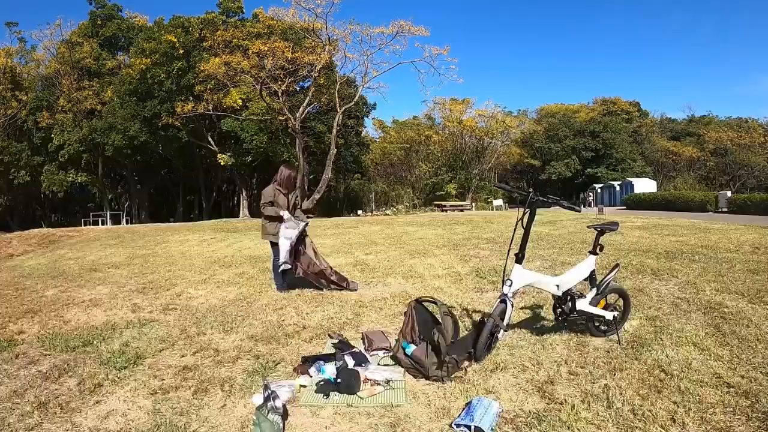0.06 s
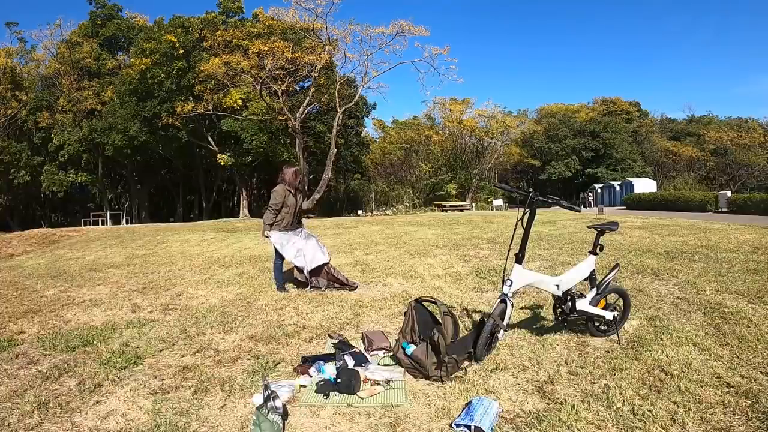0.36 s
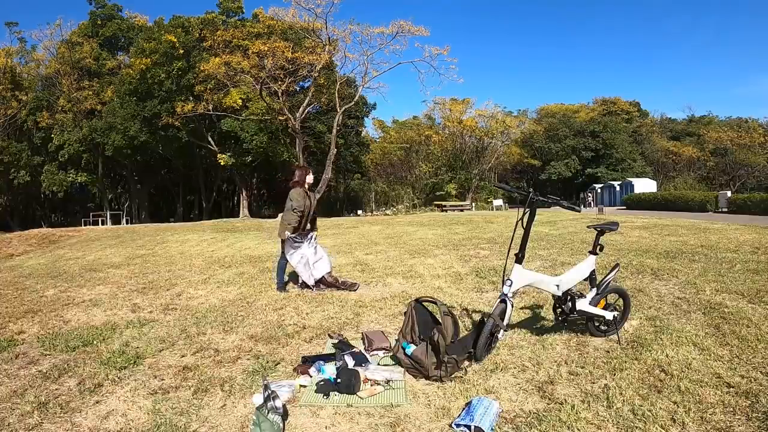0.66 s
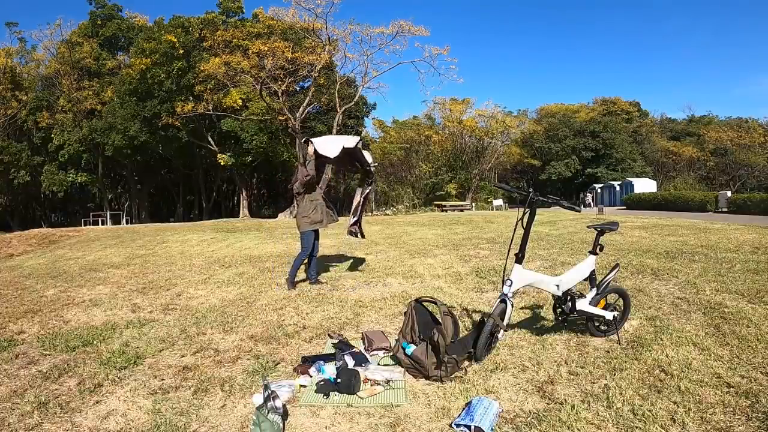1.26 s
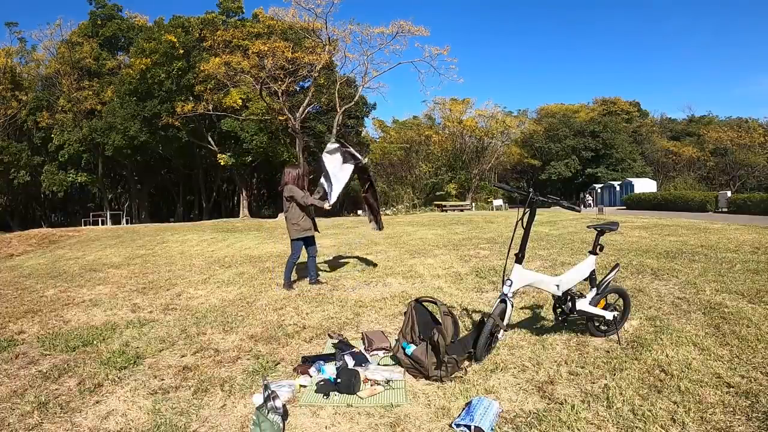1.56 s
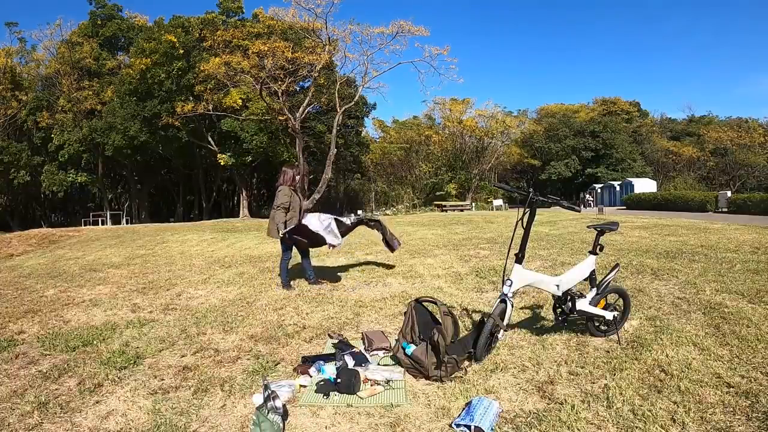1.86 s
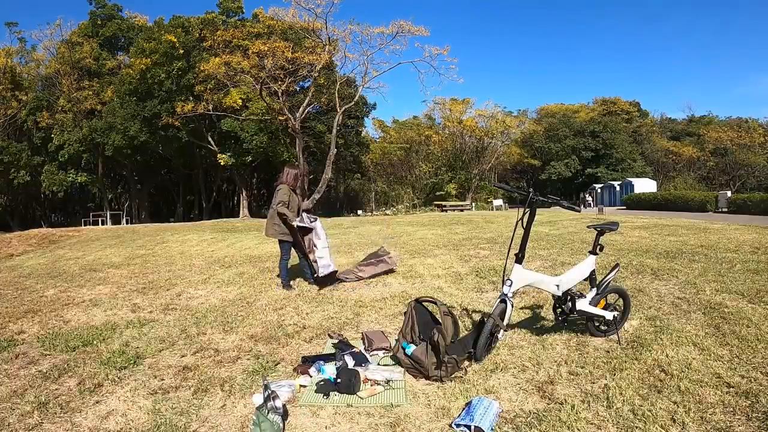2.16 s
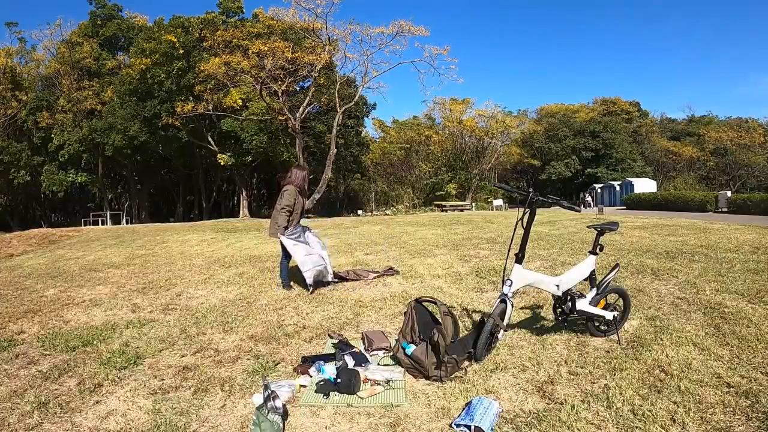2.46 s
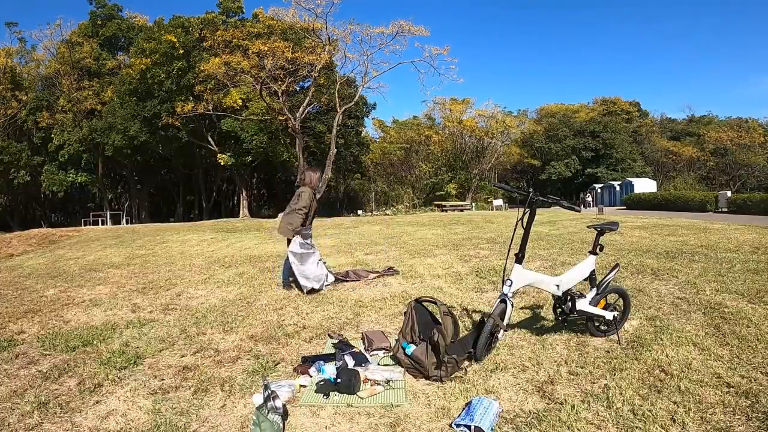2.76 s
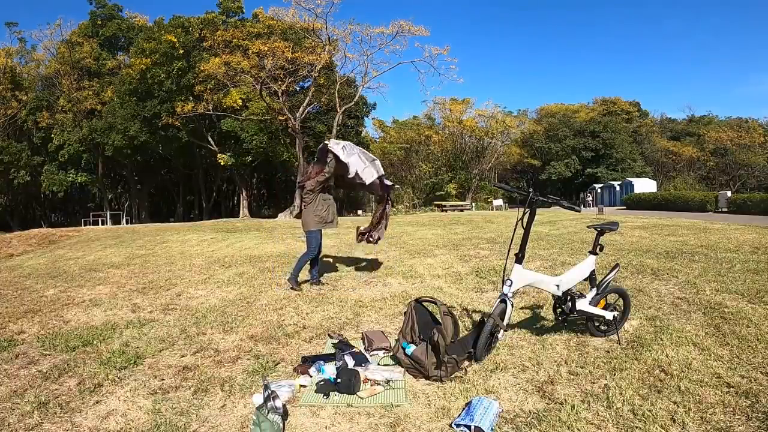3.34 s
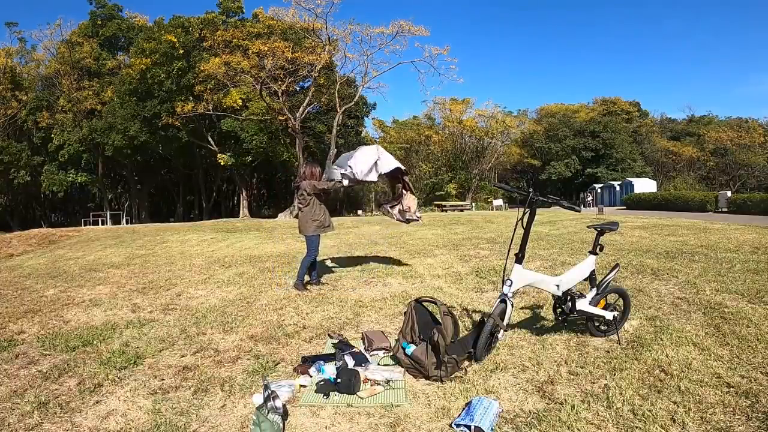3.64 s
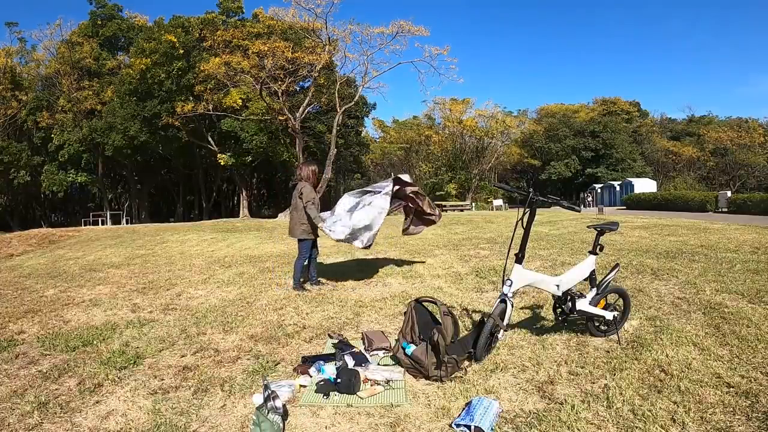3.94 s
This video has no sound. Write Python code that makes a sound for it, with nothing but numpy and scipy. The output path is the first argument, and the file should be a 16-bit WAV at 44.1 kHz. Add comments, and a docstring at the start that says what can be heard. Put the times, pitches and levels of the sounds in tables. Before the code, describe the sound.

A thin tarp rustles and crinkles as it is gathered, then swung up with a flapping whoosh. It settles on the grass with small snaps and is swung up again. A light breeze blows steadily across the open field.

```python
"""An open field cuts in from silence, nearly mono, with a light, steady breeze in the trees behind.
A thin tarp is gathered: the cloth billows, its folds crinkle in countless tiny buckles, its faces
slide with a hiss and creases snap. It is swung up at about 1 s, floats down, lands on the grass and
lies almost still, then is swung up again just after 3 s and starts to sink.
All along the grass reflects it with a hollow colour that follows its height."""
import sys
import numpy as np
from scipy import signal
from scipy.fft import rfft, irfft, next_fast_len
from scipy.io import wavfile
from scipy.ndimage import map_coordinates

SR = 44100
rng = np.random.default_rng(int(sys.argv[2]) if len(sys.argv) > 2 else 0)


def store_wav(level_fs):
    """Save 16-bit WAV to argv[1]."""
    pcm = np.round(np.clip(np.atleast_2d(level_fs), -1, 1) * 32767)
    wavfile.write(sys.argv[1], SR, pcm.T.astype(np.int16))


N = 176400


def amp(db):
    """Decibels to gain."""
    return 10 ** (np.asarray(db) / 20)


def unit(x):
    """Scale to rms 1."""
    return x / np.sqrt(np.mean(x ** 2) + 1e-20)


def wobble(rate):
    """A smooth random curve, rate knots a second."""
    return map_coordinates(rng.standard_normal(int(N * rate / SR) + 4), [np.arange(N) * rate / SR])


def coloured(x, points):
    """x through a minimum-phase EQ drawn as points of f/Hz, gain/dB."""
    m = 2 * next_fast_len(len(x))
    hz, db = np.transpose(points)
    log_gain = np.log(amp(np.interp(np.log(np.fft.rfftfreq(m, 1 / SR) + 1), np.log(hz), db)))
    causal_fold = np.r_[1, np.full(m // 2 - 1, 2), 1, np.zeros(m // 2 - 1)]
    cepstrum = irfft(log_gain, m) * causal_fold
    return irfft(rfft(x, m) * np.exp(rfft(cepstrum)), m)[:len(x)]


def noise(points):
    """Coloured noise of rms 1."""
    return unit(coloured(rng.standard_normal(N), points))


def breeze(gain_db=-46):
    """A steady bed of light wind in distant trees."""
    # wind spectrum: f/Hz, relative density/dB
    spectrum = [(20, -42), (30, -28), (38, -11), (52, -3.5), (72, -7.5), (130, -3.5), (180, -1),
                (250, -1.5), (330, -5), (580, -12), (750, -7.5), (1050, -4.5), (1500, -9.5), (2200, -10),
                (4500, -16.5), (6500, -27.5), (8500, -36.5), (9600, -33.5), (11000, -39), (14500, -54)]
    return amp(gain_db) * noise(spectrum)


def billow(level_db, gain_db=-2, flap_db=2, flaps_per_s=70):
    """The low body: air shoved about by the flapping sheet."""
    # spectrum of the shoved air: f/Hz, relative density/dB
    spectrum = [(25, -50), (70, -17.5), (135, -3.5), (230, -3), (400, 2), (660, -2.5), (900, -8.5),
                (1800, -41.5)]
    return amp(level_db + gain_db + flap_db * wobble(flaps_per_s)) * noise(spectrum)


def buckles(level_db, mid_rate_per_s=1200, rate_power=.7, low_hz=467, high_hz=11700):
    """Grains: folds buckle in tiny damped rings of random pitch, denser as the cloth moves harder."""
    t60_cycles, scatter_db = 5.6, 4.5
    rate = mid_rate_per_s * amp(level_db - level_db.mean()) ** rate_power
    count = np.cumsum(rate) / SR
    when, pitch, size, sign = rng.random((int(count[-1]), 4)).T
    start = np.searchsorted(count, when * count[-1])
    hz = low_hz * (high_hz / low_hz) ** pitch
    size_db = -scatter_db * np.log(size + .015)  # many small, a few large
    evenness = hz / np.sqrt(rate[start])  # keeps spectrum and level flat
    gain = np.sign(sign - .5) * amp(size_db) * evenness
    age = np.arange(SR // 150)
    cycles = hz[:, None] * age / SR
    rings = gain[:, None] * np.sin(2 * np.pi * cycles) * np.exp(-np.log(1000) * cycles / t60_cycles)
    return np.bincount((start[:, None] + age).ravel(), rings.ravel(), N)[:N]


def crinkle(level_db, grains, buckle_db=-3.5, rub_db=-6):
    """The midrange texture: buckling folds over the rub of cloth on cloth."""
    # spectrum of the folds: f/Hz, relative density/dB
    spectrum = [(25, -50), (200, -20), (520, -18), (800, -3.5), (1100, 0.5), (1550, -2), (2100, -1.5),
                (3000, -4.5), (4500, -7), (5500, -34), (7500, -30), (14000, -63)]
    buckling = amp(buckle_db) * unit(coloured(grains, spectrum))
    return amp(level_db) * (buckling + amp(rub_db) * noise(spectrum))


def hiss(level_db, grains, buckle_db=-5.5, slide_db=-2):
    """The grainy top: the weave sliding over itself and over the grass."""
    # spectrum of the sliding weave: f/Hz, relative density/dB
    spectrum = [(100, -47), (1500, -9.5), (3500, -6.5), (5000, 3.5), (5700, -1.5), (6800, -5),
                (8000, -12.5), (8700, -13), (9300, -8), (10800, -12.5), (12000, -20), (13500, -20),
                (14600, -56)]
    buckling = amp(buckle_db) * unit(coloured(grains, spectrum))
    return amp(level_db) * (buckling + amp(slide_db) * noise(spectrum))


def snaps(attack_s=.00028, ring_t60_cycles=9.4, crack_t60_s=.013, crack_db=3, skirt_db=-9):
    """Accents: each crease flips with a few cycles of ring and a short crack centred on its pitch."""
    # creases snapping over: t/s, relative peak level/dB, f/Hz
    creases = [(0.122, -24.5, 1360), (0.158, -18.5, 1970), (0.175, -12.5, 1810), (0.223, -20, 2270),
               (0.391, -21, 1483), (0.455, -27, 2660), (0.487, -27, 2070), (0.546, -25.5, 4500),
               (0.609, -29.5, 2660), (0.716, -29.5, 4400), (0.789, -25, 2630), (0.878, -15, 3680),
               (0.888, -10.5, 1490), (0.901, -12, 1950), (0.92, -14.5, 2050), (1.1, -14.5, 1220),
               (1.473, -24, 2950), (1.603, -22.5, 3400), (1.678, -24, 1100), (1.694, -15.5, 1050),
               (1.737, -23.5, 2190), (1.779, -26.5, 4270), (1.869, -23, 2040), (1.968, -17.5, 1460),
               (2.146, -22.5, 1860), (2.17, -24.5, 2100), (2.195, -22.5, 3080), (2.433, -12, 1730),
               (2.598, -30.5, 2100), (2.625, -26.5, 1120), (2.708, -25.5, 3380), (2.879, -29, 1180),
               (2.902, -29.5, 2550), (2.928, -31, 3260), (3.043, -19.5, 2260), (3.078, -23, 2300),
               (3.143, -17.5, 1330), (3.159, -14.5, 1140), (3.321, -12, 1690), (3.786, -23.5, 1040),
               (3.882, -25, 1058), (3.936, -21, 946)]
    # tone shared by all snaps: f/Hz, gain/dB
    tone = [(25, -34), (100, -8), (300, 3), (1000, 0.5), (3000, 1), (4900, -2.5), (6200, -13), (8400, -28),
            (10000, -22), (14000, -42)]
    out, t = np.zeros(N + SR), np.arange(SR // 20) / SR
    attack = 1 - np.exp(-t / attack_s)
    for start_s, peak_db, hz in creases:
        ring = np.sin(2 * np.pi * hz * t) * np.exp(-np.log(1000) * hz * t / ring_t60_cycles)
        crack = amp(crack_db) * rng.standard_normal(len(t)) * np.exp(-np.log(1000) * t / crack_t60_s)
        hump = [(hz / 4, skirt_db), (hz, 0), (hz * 4, skirt_db)]
        snap = coloured(coloured((ring + crack) * attack, hump), tone)
        out[round(start_s * SR):][:len(t)] += amp(peak_db) * snap / np.abs(snap).max()
    return out[:N]


def tarp(gain_db=.46, flutter_db=1.25, ripples_per_s=80):
    """Ripples in the cloth flutter billow, crinkle and hiss together; the snaps stand out on top."""
    # fader moves for gather, swing up, float down, land, lie still, swing up, float down:
    # t/s, billow level/dB, crinkle level/dB, hiss level/dB (each ahead of its layer's gains)
    moves = [(0.1, -48.5, -47, -58), (0.14, -51, -39, -54), (0.17, -53, -33, -46), (0.25, -49.5, -34, -45),
             (0.35, -40.5, -36, -46), (0.43, -51, -43, -51), (0.53, -51, -47, -57), (0.66, -54, -51, -63),
             (0.8, -51.5, -49, -59.5), (0.85, -44.5, -37, -42), (0.89, -34.5, -28, -45),
             (0.93, -34.5, -26.5, -38.5), (0.96, -34.5, -30.5, -45), (1.0, -33.5, -32, -42),
             (1.06, -29, -29, -42), (1.11, -33.5, -28.5, -40.5), (1.16, -34.5, -33, -46),
             (1.22, -46, -42, -49.5), (1.29, -51, -50, -61.5), (1.39, -53.5, -50, -58),
             (1.45, -47.5, -42, -54), (1.55, -50.5, -41.5, -51.5), (1.61, -40, -35.5, -46.5),
             (1.65, -42, -37.5, -56), (1.7, -37, -32, -49.5), (1.76, -47, -41, -54.5),
             (1.84, -42.5, -43, -60), (1.94, -48, -37.5, -51), (2.0, -44, -38.5, -54),
             (2.08, -55, -45, -56), (2.21, -48, -42, -56), (2.245, -47, -35, -39.5),
             (2.285, -33.5, -33, -40), (2.33, -44, -40, -49), (2.42, -49, -42, -54), (2.48, -48, -42, -53),
             (2.54, -61, -53, -67), (2.659, -55, -48, -58), (2.8, -60, -54, -62), (2.98, -55, -50, -82),
             (3.05, -43.5, -39, -56), (3.1, -31, -28.5, -41), (3.15, -32.5, -27, -46.5),
             (3.211, -32.5, -29, -43), (3.28, -30.5, -27, -40.5), (3.37, -39.5, -33, -45),
             (3.41, -35.5, -29, -44.5), (3.45, -45, -41, -49), (3.52, -54.5, -44, -55),
             (3.64, -45, -44, -57), (3.69, -41.5, -37.5, -50.5), (3.78, -38.5, -35.5, -51.5),
             (3.88, -37, -33.5, -50.5), (3.94, -35.5, -33.5, -51), (4.0, -40, -37, -52)]
    times, *faders = np.transpose(moves)
    billow_db, crinkle_db, hiss_db = [np.interp(np.arange(N) / SR, times, db) for db in faders]
    accents = snaps()
    flutter = amp(flutter_db * wobble(ripples_per_s))
    air = billow(billow_db)
    grains = buckles(crinkle_db)
    cloth = air + crinkle(crinkle_db, grains) + hiss(hiss_db, grains)
    return accents + amp(gain_db) * flutter * cloth


def with_grass_reflection(x, distance_m=4, mic_height_m=1.2, sound_m_per_s=343):
    """A dull bounce off the grass lags more as the tarp rises, so its hollow colour sweeps."""
    # path of the sounding folds above the grass: t/s, height/m
    path = [(0.1, 0.57), (0.9, 0.45), (1.05, 0.63), (1.45, 1.1), (1.7, 1.19), (1.9, 0.62), (2.4, 0.58),
            (2.65, 0.38), (3.05, 0.47), (3.25, 0.55), (3.55, 1.16), (3.8, 1.12), (3.93, 0.9), (4.0, 0.94)]
    # strength of the reflection: f/Hz, gain/dB
    grass = [(100, -11), (300, -8.5), (650, -6.5), (1100, -12), (1800, -20.5), (4000, -24.5)]
    n = np.arange(N)
    height_m = np.interp(n / SR, *np.transpose(path))
    lag_s = 2 * height_m * mic_height_m / distance_m / sound_m_per_s
    return x + np.interp(n - lag_s * SR, n, coloured(x, grass))


def narrow_stereo(mid, smear_s=.0098):
    """Nearly mono; a short smear adds faint width in the top treble."""
    # stereo width: f/Hz, side over mid/dB
    width = [(2000, -66), (4500, -45.5), (9000, -22), (10800, -20.5), (12000, -4.5), (14500, 2)]
    t = np.arange(SR // 20) / SR
    smear = rng.standard_normal(len(t)) * np.exp(-t / smear_s)
    smear /= np.linalg.norm(smear)
    side = coloured(signal.fftconvolve(mid, smear)[:N], width)
    return np.array([mid + side, mid - side])


def scene():
    """The breeze bed behind the tarp and its bounce off the grass."""
    return narrow_stereo(breeze() + with_grass_reflection(tarp()))


def record(dry, cut_in_s=.095, top_hz=14500):
    """Roll off the top, cut in hard from silence and finish with a brick-wall low-pass."""
    # master EQ: f/Hz, gain/dB
    roll_off = [(100, 2.5), (11500, 0), (13000, -7), (14000, -9), (14600, -26)]
    gate = np.arange(N) / SR >= cut_in_s
    gated = gate * np.array([coloured(channel, roll_off) for channel in dry])
    m = next_fast_len(N + SR // 2)
    passband = np.fft.rfftfreq(m, 1 / SR) < top_hz
    return irfft(rfft(gated, m) * passband, m)[:, :N]


dry = scene()
out = record(dry)
store_wav(out)
```